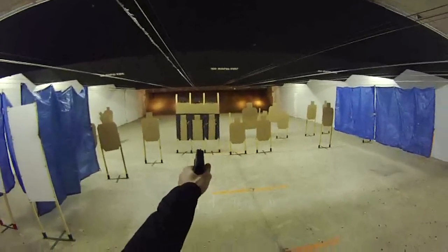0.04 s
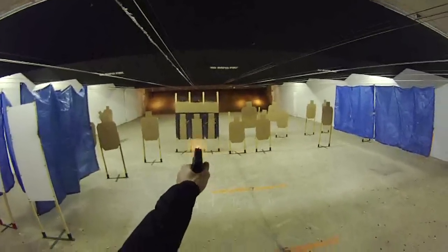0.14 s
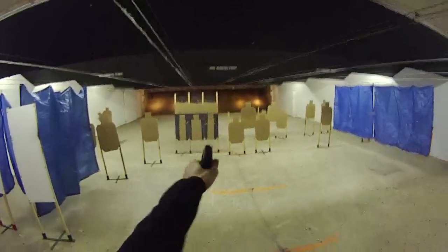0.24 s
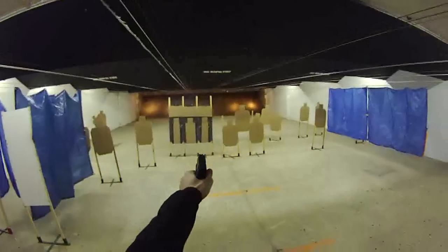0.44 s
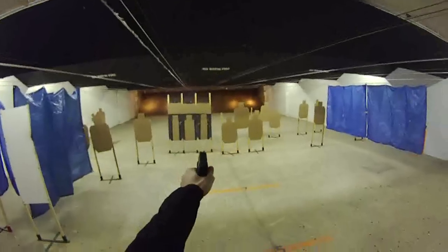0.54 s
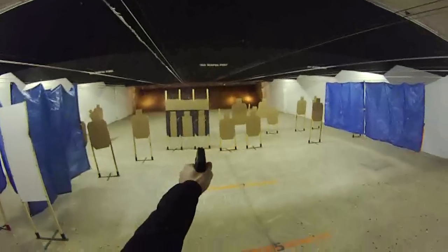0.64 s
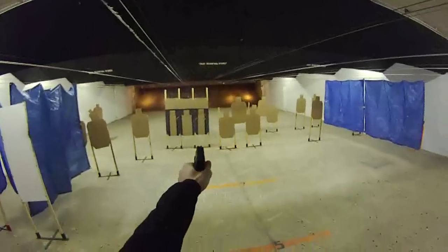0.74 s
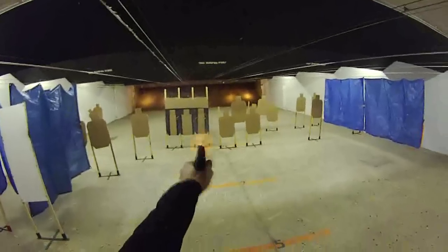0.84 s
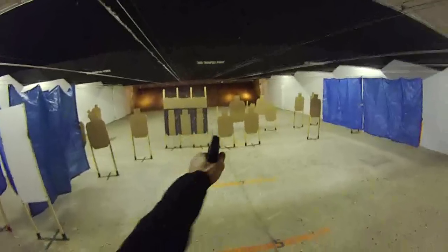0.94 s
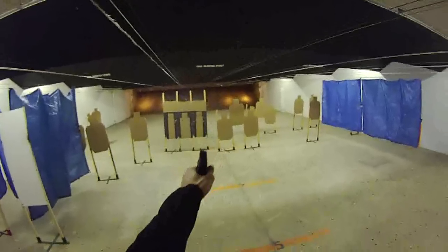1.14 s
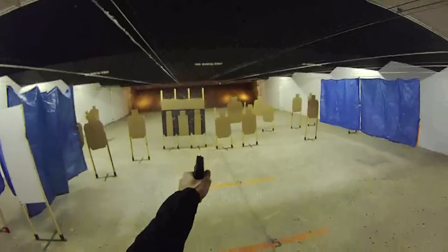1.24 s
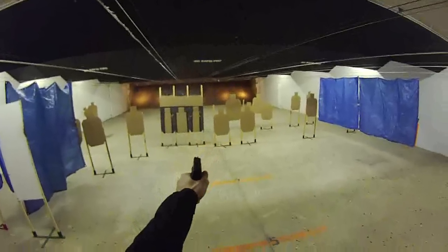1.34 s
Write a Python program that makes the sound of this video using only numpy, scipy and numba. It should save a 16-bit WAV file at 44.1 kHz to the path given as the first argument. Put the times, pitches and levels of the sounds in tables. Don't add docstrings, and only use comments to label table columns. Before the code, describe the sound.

Handgun fires two loud, sharp shots in an indoor range, each ringing into long echo

```python
import sys
import numpy as np
from scipy import signal
from scipy.fft import rfft, irfft
from scipy.io import wavfile
from numba import njit

SR = 44100
rng = np.random.default_rng(int(sys.argv[2]) if len(sys.argv) > 2 else 0)


def voltage_ratio(decibels):
    exponent = np.asarray(decibels, float) / 20
    return 10 ** exponent


def bounce(signal):
    frames = np.transpose(np.atleast_2d(signal))
    limited = np.clip(frames, -1, 1)
    pcm = np.round(limited * 32767).astype(np.int16)
    wavfile.write(sys.argv[1], SR, pcm)


N = 61739
LEAD_S = 0.0006


def unit(x):
    return x / np.sqrt(np.mean(x ** 2) + 1e-20)


def along(points, hz):
    point_hz, value = np.transpose(points)
    return np.interp(np.log(hz + 1), np.log(point_hz + 1), value)


def colour(x, db_of):
    gain = voltage_ratio(db_of(np.fft.rfftfreq(8192, 1 / SR)))
    cepstrum = irfft(np.log(gain + 1e-6))
    cepstrum[1:4096] *= 2
    cepstrum[4097:] = 0
    impulse = irfft(np.exp(rfft(cepstrum)))
    return signal.fftconvolve(x, impulse)[:len(x)]


def highpass(x, hz):
    return signal.lfilter(*signal.butter(2, hz / (SR / 2), "high"), x)


def blast(bright_db):
    # delay in seconds, level in dB.
    slaps = [
        (.003, 8),
        (.0075, 1),
        (.012, 8.5),
        (0.032, -2),
        (.05, -18.5),
        (0.084, -24),
        (0.102, -24),
    ]
    pulse_s, pulse_db, knock_db = 0.00016, 16, -10
    crack_hz, crack_db, crack_hold_s, crack_t60_s = 8000, 33, 0.0017, 0.03
    t = np.arange(SR // 20) / SR
    pulse = voltage_ratio(pulse_db) * (1 - t / pulse_s) * np.exp(-t / pulse_s)
    crack_fall_db = 60 * np.maximum(t - crack_hold_s, 0) / crack_t60_s
    crack = highpass(rng.standard_normal(len(t)), crack_hz)
    crack *= voltage_ratio(crack_db + bright_db - crack_fall_db)
    lead = round(LEAD_S * SR)
    taps = np.zeros(SR // 4)
    taps[0] = voltage_ratio(knock_db)
    taps[lead] += voltage_ratio(0.0071)
    for delay_s, db in slaps:
        taps[round(delay_s * SR) + lead] += voltage_ratio(db)
    out = signal.fftconvolve(pulse, taps)
    out[lead:lead + len(t)] += crack
    return out


def hall(noise):
    # frequency in Hz, t60 in seconds.
    t60 = [(100, 2.1), (260, 1.295), (700, 1.18), (1800, 1.11), (4000, 0.81), (7000, 0.58), (12000, 0.44)]
    late_db, late_longer = -31.5, 1.53
    early_db, early_tilt_db, early_hold_s, early_t60_s = -8.5, 2, 0.072, 0.12
    build_s = 0.002
    hz, t, spectrum = signal.stft(noise, SR, nperseg=256)
    fall_db = -60 * t / along(t60, hz)[:, None]
    tilt_db = early_tilt_db * np.log2(hz[:, None] / 1000 + 1)
    early_fall_db = 60 * np.maximum(t - early_hold_s, 0) / early_t60_s
    main = voltage_ratio(fall_db)
    late = voltage_ratio(late_db + fall_db / late_longer)
    early = voltage_ratio(early_db + tilt_db - early_fall_db)
    tail = signal.istft(spectrum * (main + late + early), SR, nperseg=256)[1][:len(noise)]
    return tail * (1 - np.exp(-np.arange(len(noise)) / SR / build_s))


def case_db(hz):
    # frequency in Hz, gain in dB.
    broad = [(40, -44), (130, -22), (450, -3), (800, 2.5), (1800, -4), (5000, -18.5), (9000, -26.5),
             (15000, -31)]
    # centre in Hz, width in
    # Hz, gain in dB.
    bumps = [(65, 24, 6), (310, 180, 1.5), (643, 61, 2), (3080, 320, -8), (4210, 815, 10),
             (4653, 350, -11.5), (5570, 530, 1.5), (9170, 1040, 3)]
    return along(broad, hz) + sum(db * np.exp(-((hz - c) / w) ** 2) for c, w, db in bumps)


def gun():
    # start in seconds, peak in dB, crack brightness in dB.
    shots = [
        (0.199, -7, -1),
        (0.888, -7.5, 0.5),
    ]
    earlier = (-0.7, -6.5, 0)
    hall_db, alike = -5, 0.66
    span = 5 * SR // 2
    out = np.zeros(N + 4 * SR)
    same = rng.standard_normal(span)
    case_gain = voltage_ratio(case_db(np.linspace(0, SR / 2, num=999)))
    tail_gain = voltage_ratio(hall_db) / np.sqrt(np.mean(case_gain ** 2))
    for start_s, peak_db, bright_db in [earlier] + [tuple(row) for row in shots]:
        noise = np.sqrt(alike) * same + np.sqrt(1 - alike) * rng.standard_normal(span)
        shot = np.roll(tail_gain * hall(noise), round(LEAD_S * SR))
        near = blast(bright_db)
        shot[:len(near)] += near
        first = round((start_s + 1) * SR)
        out[first:first + span] += voltage_ratio(peak_db) * shot
    return colour(out, case_db)[SR:SR + N]


def ventilation():
    # frequency in Hz, density in dB per Hz.
    air = [(60, -26.5), (110, -11.5), (140, 0), (400, 4.5), (900, -11.5), (2000, -25.5), (3500, -58),
           (12000, -52.5)]
    level_db = -56.5
    noise = colour(rng.standard_normal(N + SR), lambda hz: along(air, hz))
    return voltage_ratio(level_db) * unit(noise[SR:])


def scene():
    return (gun() + ventilation())[None]


@njit
def limit(x, top, keep):
    y, seen = np.empty_like(x), top
    for i in range(len(x)):
        seen = max(abs(x[i]), top + keep * (seen - top))
        y[i] = x[i] * top / seen
    return y


def top_cut(x):
    return signal.sosfilt(signal.butter(12, 16540, fs=SR, output="sos"), x)


def record(dry):
    bass_hz, treble_hz, preamp_db = 319, 1110, 5.5
    hiss_db, hiss_hz = -88, 12500
    ceiling, release_s = 0.705, 0.0019
    top_hz, top_wide_hz, fade_s = 15700, 600, 0.003
    x = highpass(dry[0], bass_hz)
    x = voltage_ratio(preamp_db) * signal.lfilter(*signal.butter(1, treble_hz / (SR / 2)), x)
    x = x + voltage_ratio(hiss_db) * colour(rng.standard_normal(N), lambda hz: -14.0 * (hz > hiss_hz))
    x = limit(x, ceiling, np.exp(-1 / (release_s * SR)))
    x = colour(x, lambda hz: -6 * np.clip((hz - top_hz) / top_wide_hz + 1, 0, 9) ** 2)
    x = x * np.clip((N - np.arange(N)) / (fade_s * SR), 0, 1)
    return top_cut(x[None])


dry = scene()
out = record(dry)
bounce(out)
```